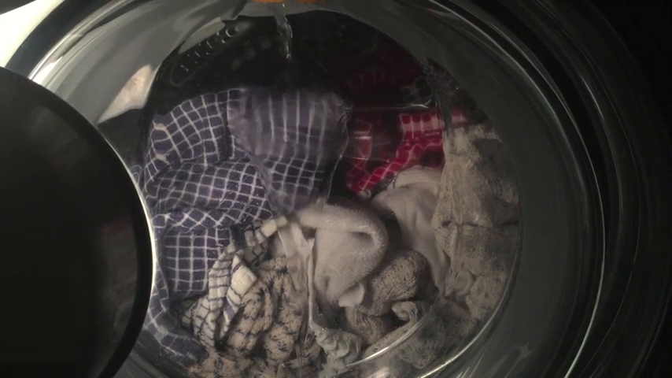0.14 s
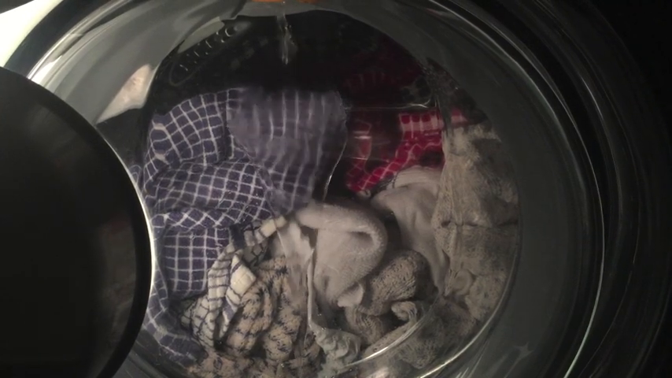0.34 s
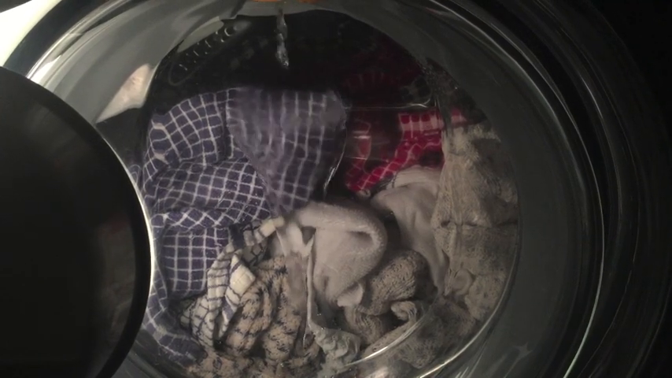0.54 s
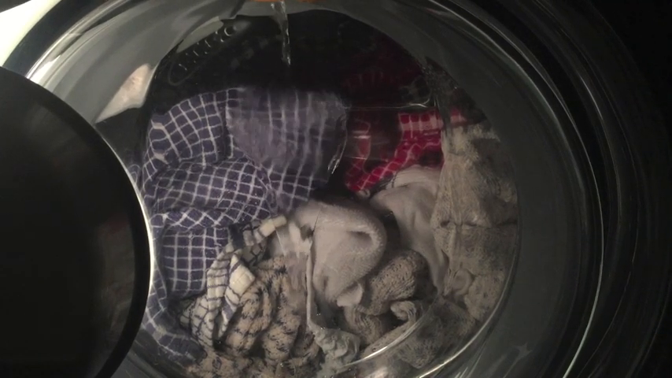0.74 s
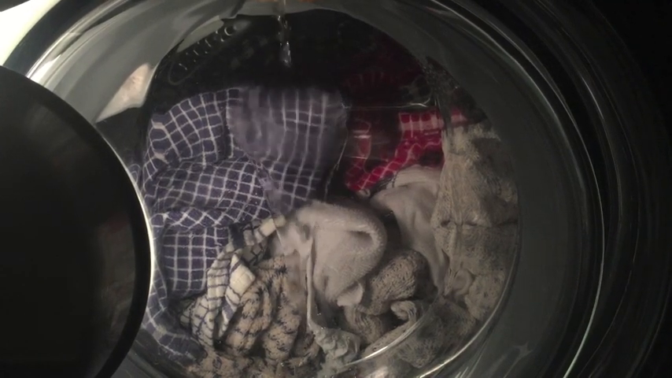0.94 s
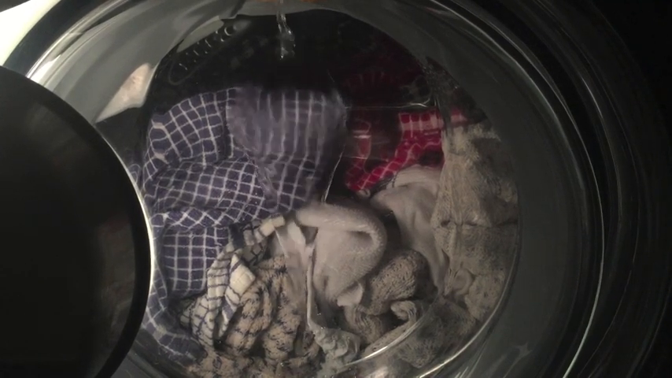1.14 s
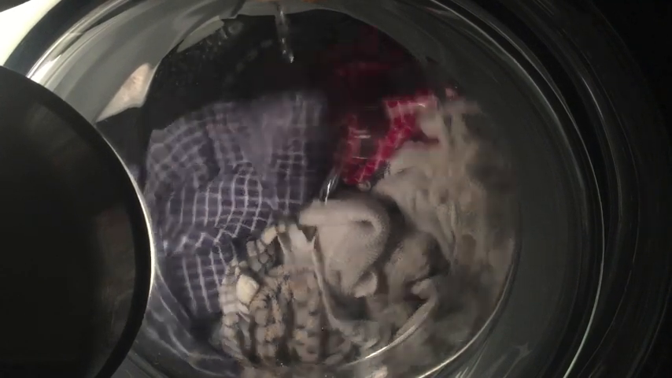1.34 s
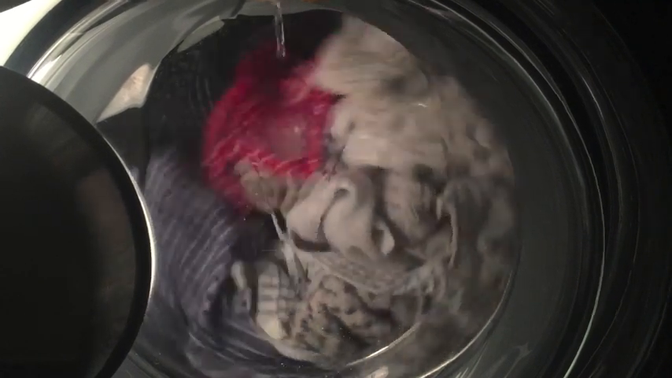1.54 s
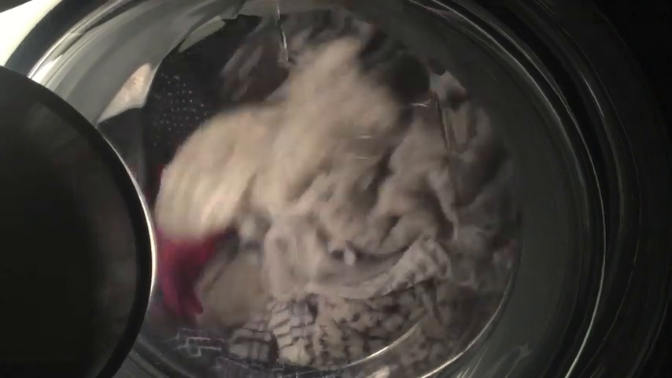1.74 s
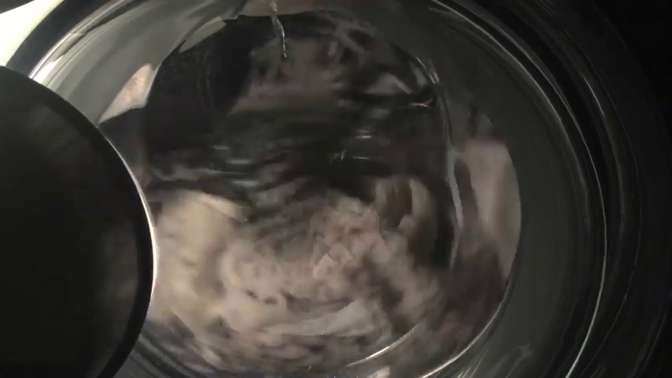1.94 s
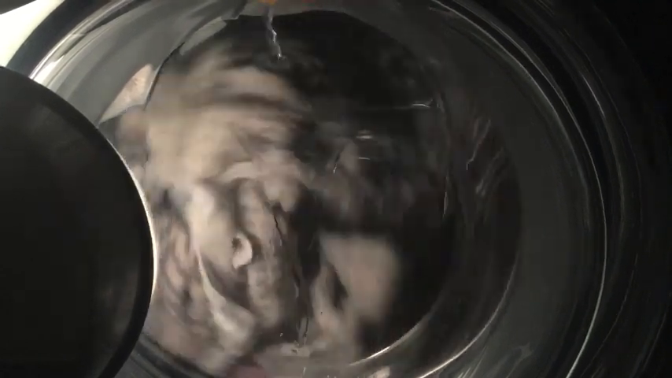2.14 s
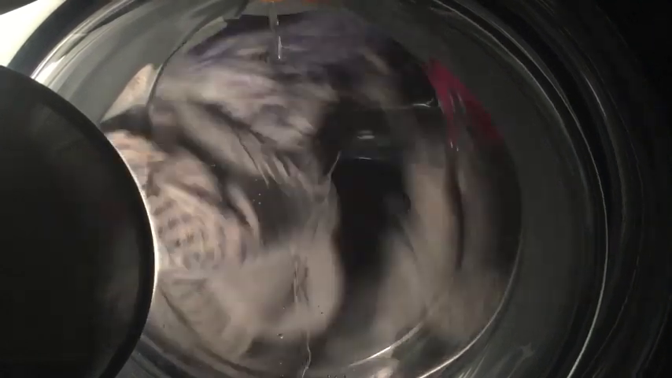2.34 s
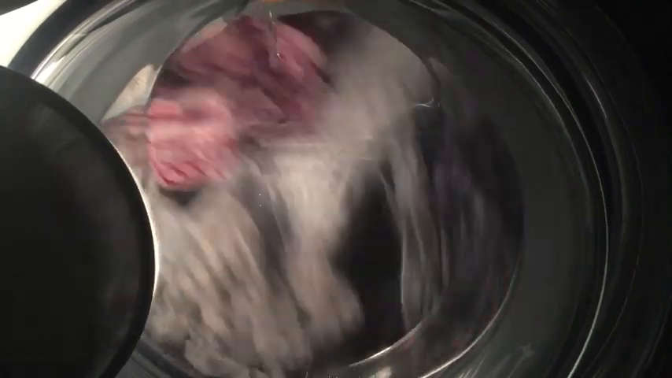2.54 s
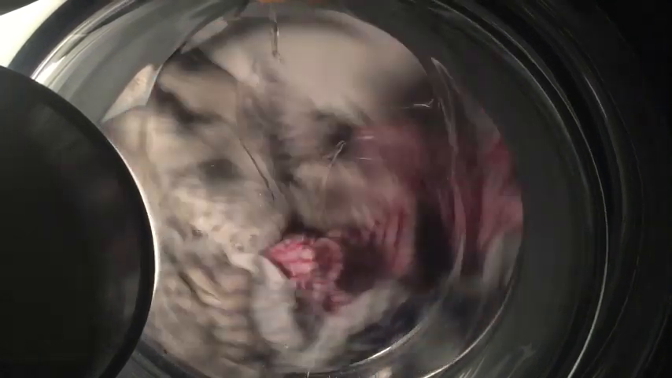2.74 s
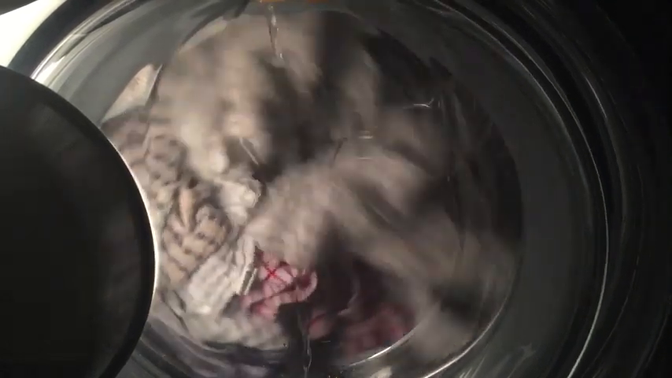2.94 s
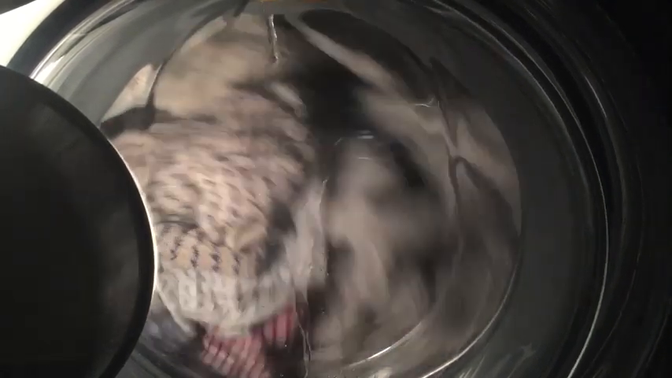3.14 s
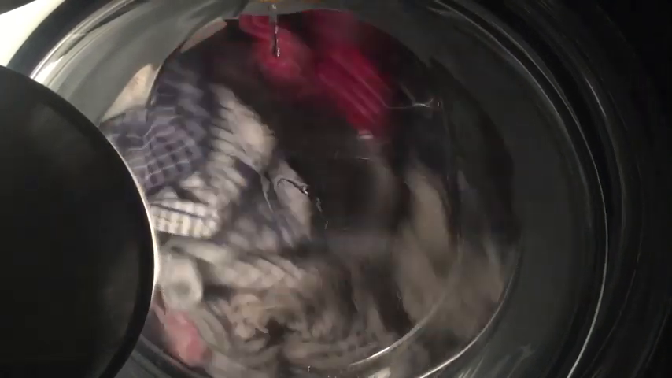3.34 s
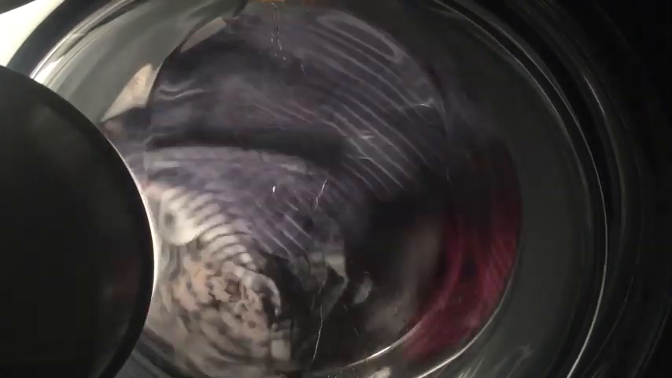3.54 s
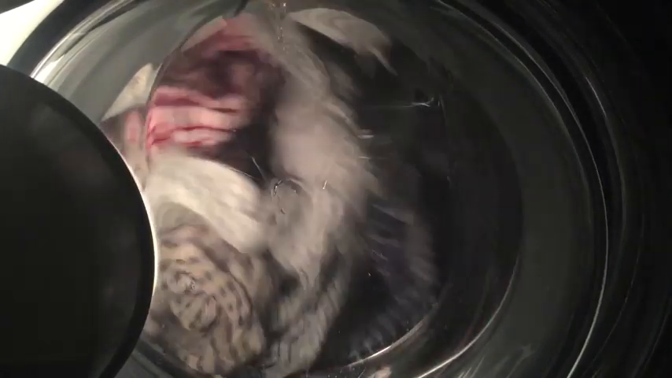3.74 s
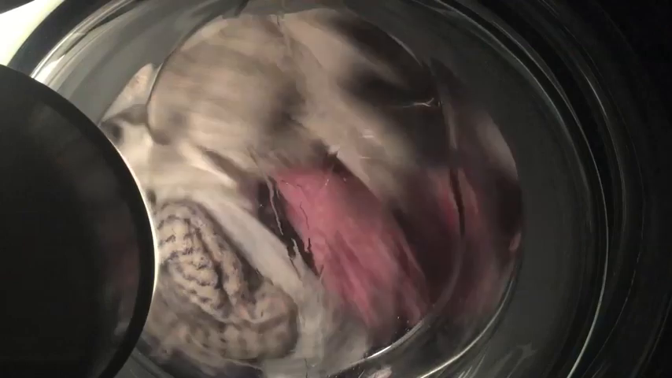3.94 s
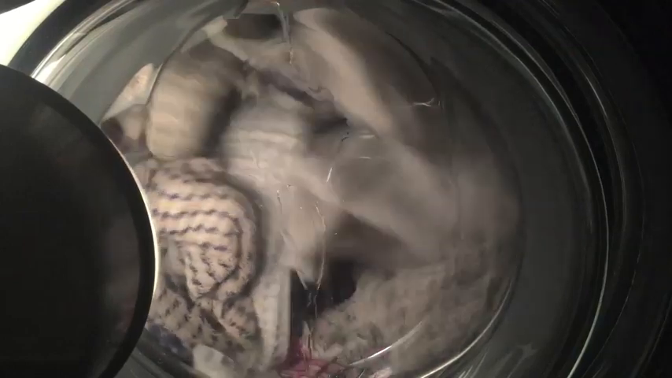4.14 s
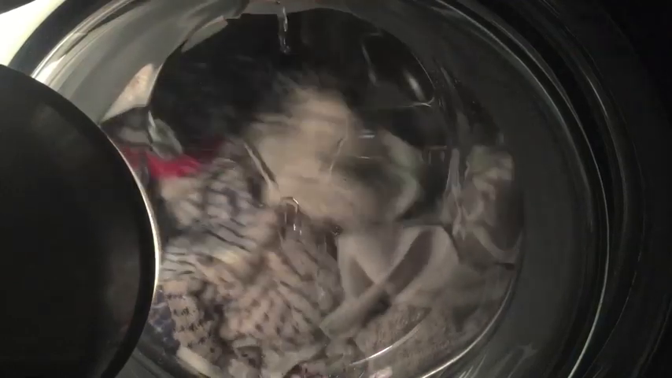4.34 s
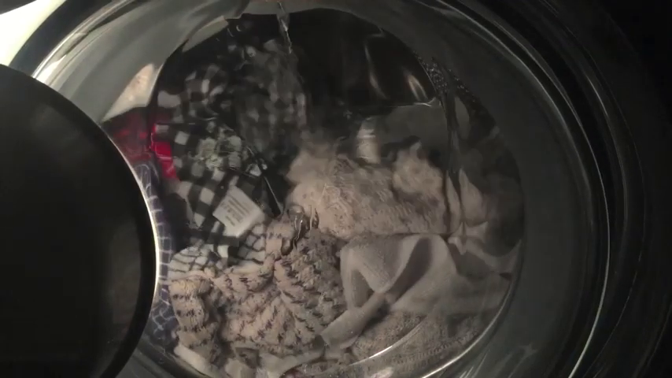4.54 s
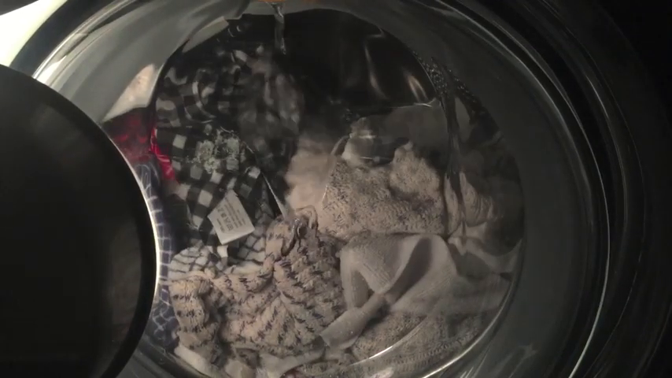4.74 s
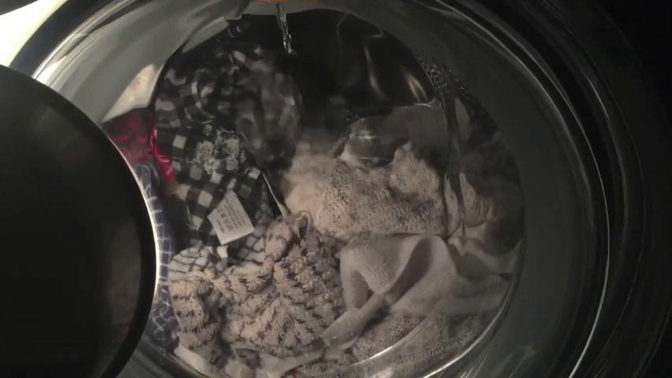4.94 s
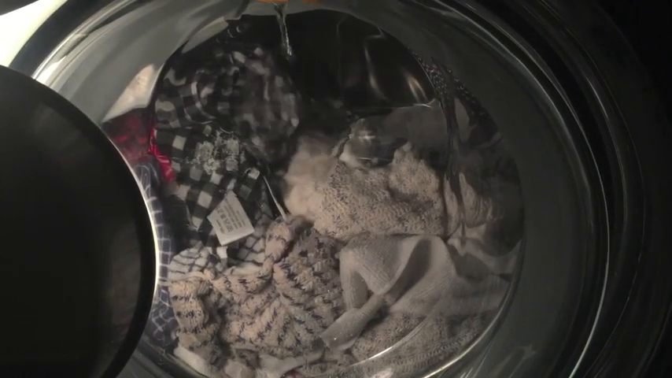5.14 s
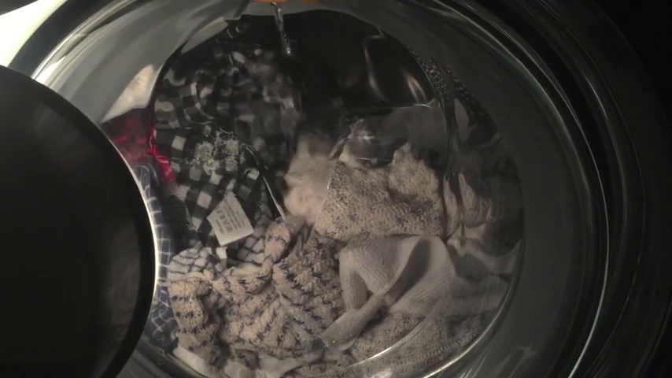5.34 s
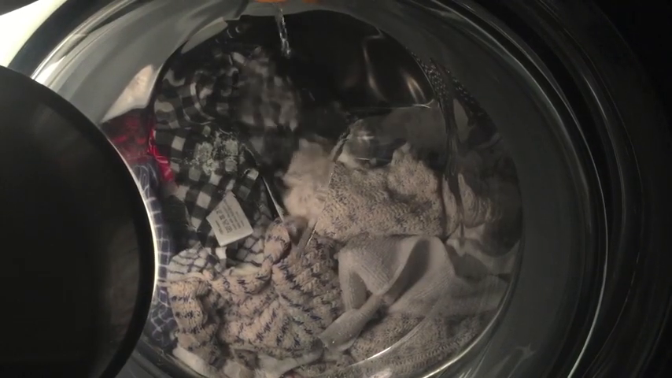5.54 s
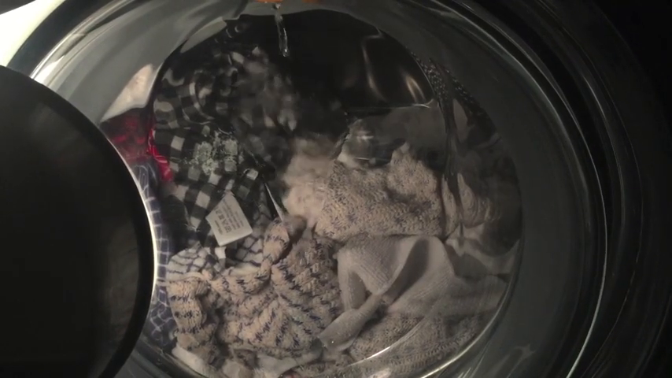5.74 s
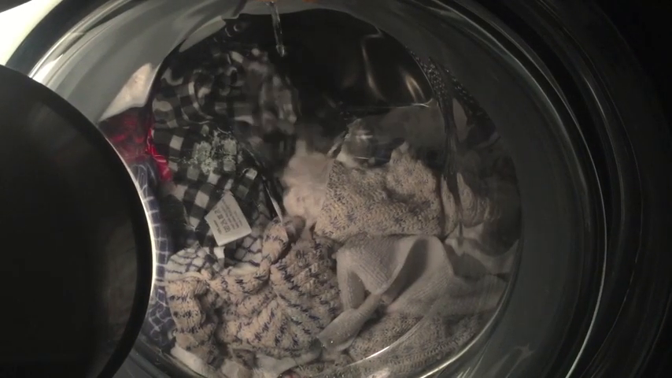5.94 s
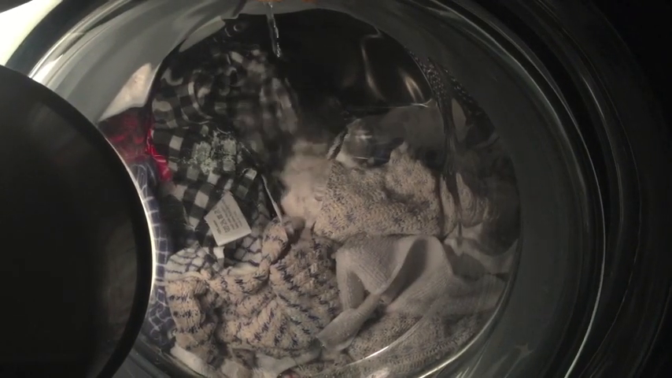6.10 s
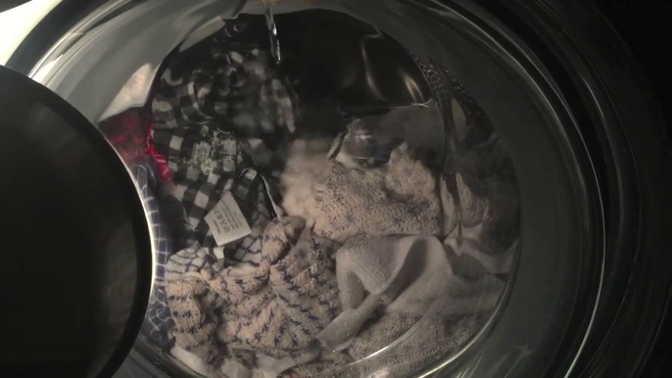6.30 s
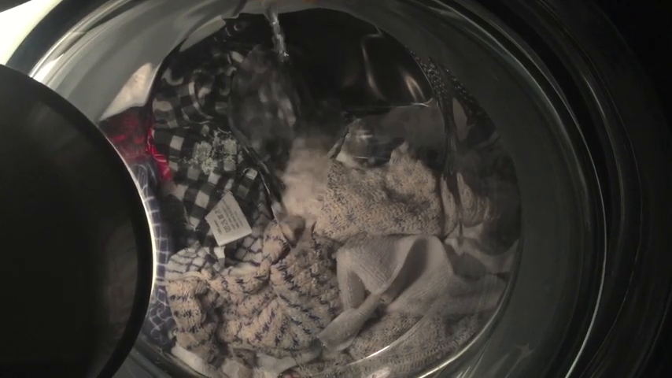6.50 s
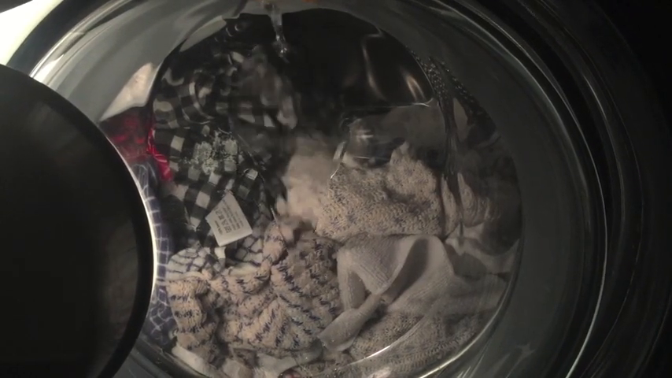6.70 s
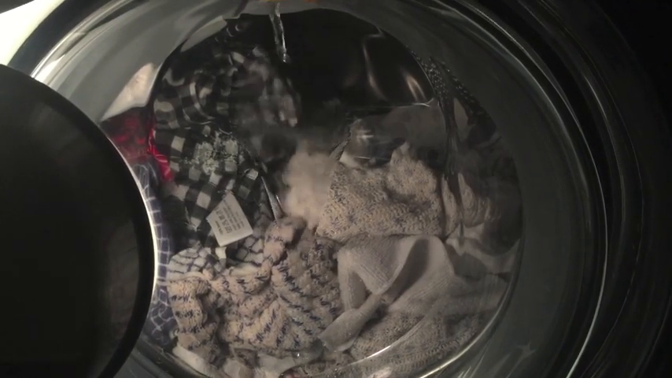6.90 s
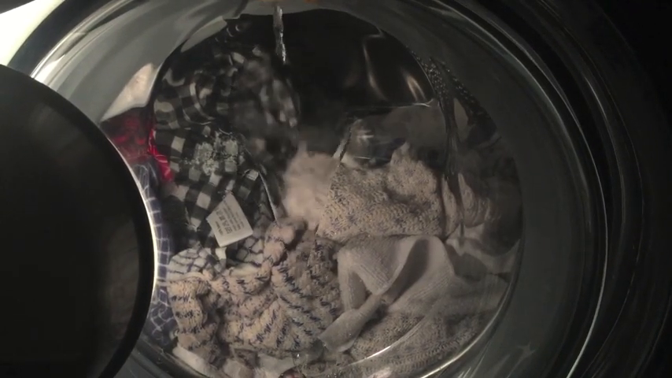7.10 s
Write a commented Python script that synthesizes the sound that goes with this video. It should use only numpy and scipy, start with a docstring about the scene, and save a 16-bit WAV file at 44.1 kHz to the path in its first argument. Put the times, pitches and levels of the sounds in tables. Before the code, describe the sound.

Close to a front-loading washer: quiet hum, a sudden turn with rushing water, hollow churning and motor groan, then a soft bump and drips.

```python
"""Laundry room, one microphone close to the door of a front-loading washing machine. It rests with a mains hum,
then the drum turns for five seconds: water rushes out of the lifted laundry and rings the steel, churns
and gurgles in the hollow tub, and wet cloth thuds down while the motor groans and whines. The tub rocks as
the drum starts and stops; afterwards the water settles with a dribble and a few plops. Drops are random
impacts, bubbles and low knocks swelling rings, cloth and air coloured noise, the motor moving tones."""
import sys
import numpy as np
from scipy import signal
from scipy.fft import rfft, irfft
from scipy.io import wavfile

SR = 44100
rng = np.random.default_rng(int(sys.argv[2]) if len(sys.argv) > 2 else 0)


def bounce(signal):
    """Save signal as a 16-bit WAV file at the path given by the first command-line argument."""
    frames = np.transpose(np.atleast_2d(signal))
    limited = np.clip(frames, -1, 1)
    pcm = np.round(limited * 32767).astype(np.int16)
    wavfile.write(sys.argv[1], SR, pcm)


N = 315756
T = np.arange(N) / SR
FREQS = np.fft.rfftfreq(N, 1 / SR)

# the drum turns from START_S until it brakes at STOP_S; the water follows a little later
START_S, STOP_S, WATER_LAG_S = 1.285, 6.3, 0.039
# air pockets gulping under the load: start_s, peak_db (before reflections), swell_s
GULPS = [(1.378, -37, 0.0044), (1.429, -31.5, 0.0046), (1.967, -29.5, 0.0032), (2.009, -28, 0.0061),
         (2.023, -24, 0.011), (2.848, -23.5, 0.0093), (3.077, -30, 0.0047), (3.117, -30.5, 0.0094),
         (3.157, -35.5, .0045), (3.238, -32, 0.0058), (3.423, -31.5, 0.0056), (3.529, -27.5, 0.0053),
         (3.563, -28.5, 0.0059), (3.853, -26.5, 0.0094), (4.433, -32, 0.0022), (5.319, -33.5, 0.0068),
         (5.586, -30.5, 0.006), (5.994, -29.5, 0.0075)]
# the lifted load empties in gushes: start_s, length_s, level_db
GUSHES = [(1.38, 0.42, -41.5), (1.864, 0.082, -43.5), (1.966, 0.34, -51.5)]
# colour of droplets on the door: frequency_hz, relative_level_db
SPRAY = [(1500, -11), (2550, 0), (3000, -8), (4150, -4.5), (4800, -12), (5700, -6), (6800, -10.5),
         (10400, -17), (12300, -16), (15000, -21)]


def undb(db):
    """Decibels to gain."""
    return 10 ** (np.asarray(db) / 20)


def unit(x):
    """Scale to rms 1."""
    return x / np.sqrt(np.mean(x ** 2))


def colour(x, points):
    """Causal minimum-phase filter through (Hz, dB) points; rms 1."""
    hz, db = np.transpose(points)
    gain_db = np.interp(np.log(FREQS + 1), np.log(hz), db)
    cepstrum = irfft(np.log(undb(gain_db)), N)
    # folding the cepstrum onto positive time makes the filter causal
    cepstrum[1:N // 2] *= 2
    cepstrum[N // 2 + 1:] = 0
    return unit(irfft(rfft(x) * np.exp(rfft(cepstrum)), N))


def walk(rate):
    """Smooth random drift of rms 1 that changes about rate times a second."""
    return unit(irfft(rfft(rng.standard_normal(N)) * np.exp(-(FREQS / rate) ** 2), N))


def impacts(rate, spread_db):
    """Random tiny impacts, about rate a second, of uneven strength; rms 1."""
    size = undb(spread_db * np.minimum(rng.exponential(size=N), 4))
    struck = rng.random(N) < rate / SR
    return unit(struck * size * rng.choice([-1, 1], N))


def add(out, start_s, x):
    """Mix a short sound in at its time."""
    i = int(start_s * SR)
    out[i:i + len(x)] += x[:max(N - i, 0)]


def ring(hz, swell_s, glide):
    """A damped ring of about peak 1; at swell_s it is loudest and at hz, gliding by that share per swell_s."""
    age = np.arange(int(4 * swell_s * SR)) / (swell_s * SR)
    envelope = age * np.exp((1 - age ** 2) / 2)
    cycles = hz * swell_s * age * (1 + glide * (age / 2 - 1))
    return envelope * np.sin(2 * np.pi * cycles)


def bubbling(low_hz, high_hz, cycles, spread_db, count):
    """A crowd of bubbles of random size, each swelling over the given cycles; rms 1."""
    out = np.zeros(N)
    for when, size, strength in rng.random((count, 3)):
        hz = low_hz * (high_hz / low_hz) ** size
        loud = undb(-spread_db * np.log(max(strength, 1 / 40)))
        add(out, when * N / SR, loud * ring(hz, cycles / hz, glide=0.02))
    return unit(out)


def enclosure(x, t60_s, wet_db):
    """Dense short reflections between drum and door glass, as a decaying noise tail."""
    t = T[:SR // 4]
    tail = rng.standard_normal(len(t)) * undb(-60 * t / t60_s)
    return x + undb(wet_db) * signal.fftconvolve(x, tail / np.linalg.norm(tail))[:N]


def bursts(table):
    """Envelope of sudden contacts, each fading at its own pace."""
    out = np.zeros(N)
    for s, db, decay_s in table:
        age = T[:SR // 2]
        add(out, s, undb(db) * (1 - np.exp(-age / 0.0012)) * np.exp(-age / decay_s))
    return out


def swell(start_s, length_s, rise_s, fall_db_s, sag_db_s=0):
    """Envelope that rises, holds (sagging a little) and dies away."""
    age = np.maximum(T - start_s, 0)
    rise = np.sin(np.pi / 2 * np.minimum(age / rise_s, 1)) ** 2
    return rise * undb(-sag_db_s * age - fall_db_s * np.maximum(age - length_s, 0))


def turning(lag_s, rise_s, fall_db_s, sag_db_s=0):
    """Envelope of something that sounds for as long as the drum turns, lag_s behind it."""
    return swell(START_S + lag_s, STOP_S - START_S, rise_s, fall_db_s, sag_db_s)


def sine(hz):
    """A tone of rms 1 that follows a moving pitch."""
    return np.sqrt(2) * np.sin(2 * np.pi * np.cumsum(hz) / SR)


def resonate(x, hz, width_hz):
    """A resonance whose centre follows a moving pitch; rms 1."""
    turn = np.exp(2j * np.pi * np.cumsum(hz) / SR)
    # shift the centre to 0 Hz, low-pass there, and shift back
    lowpass_b, lowpass_a = signal.butter(2, width_hz / 2, fs=SR)
    return unit((signal.lfilter(lowpass_b, lowpass_a, x / turn) * turn).real)


def room():
    """The resting machine and room: a soft rush of coloured noise with a faint trickle in the drum."""
    # frequency_hz, relative_level_db
    air_colour = [(25, -47), (45, 4.5), (115, 13), (170, -1.5), (300, 0.5), (430, -5), (600, 0), (1100, 2),
                  (2600, -9.5), (6000, -15.5), (15000, -22.5)]
    air = colour(rng.standard_normal(N) * undb(.5 * walk(8.3)), air_colour)
    trickle = bubbling(low_hz=750, high_hz=1700, cycles=7, spread_db=3, count=500)
    return air * undb(-68.0) + trickle * undb(-78)


def mains_hum():
    """Steady mains tones throughout, stronger and more wavering while the drum turns."""
    # frequency_hz, rms_db at rest
    partials = [(100, -64), (500, -83.5)]
    hum = sum(np.sqrt(2) * undb(db) * np.sin(2 * np.pi * (hz * T + rng.random())) for hz, db in partials)
    running = turning(0, rise_s=0.086, fall_db_s=80, sag_db_s=0.8)
    wobble = walk(7)
    boost_db = running * (11.5 + 3.3 * wobble)
    return hum * undb(boost_db + 0.54 * wobble)


def squelch(hz, count):
    """A handful of bubbles of nearly one size burst in quick succession; peak 1."""
    length_s, pitch_spread, swell_s = .013, 0.082, 0.0034  # the spread is a share of the pitch
    out = np.zeros(SR // 10)
    for k, size in enumerate(rng.permutation(np.linspace(-1, 1, count))):
        delay_s = length_s * (k + rng.random()) / count
        bubble = ring(hz * (1 + pitch_spread * size), swell_s, glide=0)
        add(out, delay_s, bubble / (1 + 2 * size ** 2))
    return out / np.max(np.abs(out))


def bubbles_and_knocks():
    """Bubbles, alone or in clusters, and low knocks of the load on the drum wall, echoing in the drum."""
    # small clusters of bubbles bursting: start_s, peak_db (before reflections), pitch_hz
    squelches = [(.449, -57, 1115), (.842, -62, 2230), (.905, -69, 3170), (1.124, -54, 2490),
                 (3.03, -47, 1880), (4.43, -50, 1730), (4.54, -53, 2030), (4.614, -49, 1650),
                 (5.333, -45, 2140), (5.5, -45.5, 1720), (5.855, -51, 2120), (6.092, -53, 3930),
                 (6.357, -58, 4800), (6.63, -49.5, 1950), (6.843, -52, 1640)]
    # single bubbles and low drum knocks: start_s, peak_db (before reflections), pitch_hz, swell_s
    plops_and_knocks = [(1.463, -39, 523, 0.0057), (1.778, -33, 1444, 0.007), (2.337, -40, 202, 0.015),
                        (2.344, -31, 315, 0.01), (3.595, -33.5, 1265, 0.0033), (3.997, -39.5, 306, 0.011),
                        (5.499, -37.5, 1230, 0.0045), (6.387, -42.5, 1216, .004), (6.505, -35, 1270, 0.005),
                        (6.714, -45.5, 1270, 0.0057), (6.822, -41.5, 1294, 0.0043),
                        (6.869, -44, 1265, 0.0042), (6.923, -49.5, 1254, 0.0079)]
    out = np.zeros(N)
    for s, db, hz in squelches:
        add(out, s, undb(db) * squelch(hz, count=5))
    for s, db, hz, swell_s in plops_and_knocks:
        add(out, s, undb(db) * ring(hz, swell_s, glide=0.006))
    return enclosure(out, t60_s=.18, wet_db=-9)


def motor():
    """The motor sings briefly as it pulls away, groans low under load and whines thinly: unsteady sine tones."""
    # hauling a heavy wad up the drum wall: start_s, length_s, level_db
    hauls = [(1.285, 0.75, -63.5), (2.037, 0.47, -56), (3.03, 1, -59.5)]
    # pulling away: start_s, length_s, pitch_hz, level_db
    start_notes = [(1.29, 0.05, 4800, -80), (1.354, 0.097, 5470, -74.5)]
    groan_hz, climb_hz_s = 302.3, 11  # pitch as the drum starts, and its climb from there
    effort = sum(undb(db) * swell(s, length_s, rise_s=0.04, fall_db_s=98) for s, length_s, db in hauls)
    pitch_hz = groan_hz + climb_hz_s * (T - START_S)
    groan = sine(pitch_hz * (1 + 0.00802 * walk(8.1))) * effort
    # the thin whine fades as the load eases
    whine = sine(15030 + 28 * walk(60)) * undb(-77 + 2 * walk(17))
    whine = whine * swell(START_S, length_s=2.7, rise_s=.1, fall_db_s=100, sag_db_s=5)
    flutter = 1 + .009 * walk(150)
    notes = sum(sine(hz * flutter) * undb(db) * swell(s, length_s, rise_s=.005, fall_db_s=598)
                for s, length_s, hz, db in start_notes)
    return groan + whine + notes


def laundry():
    """Wet cloth rolls on the drum wall as dense small impacts and lands in thuds of decaying noise."""
    # frequency_hz, relative_level_db
    cloth_colour = [(50, -43), (88, 3.5), (125, -2), (168, 6), (215, -2.5), (312, -1), (395, -9),
                    (490, -1.5), (570, -2), (800, -48)]
    # heavy wet cloth landing: start_s, level_db, decay_s
    thud_table = [(1.355, -46.5, 0.019), (1.865, -45, 0.04), (2.12, -54, 0.18), (2.335, -55, 0.064),
                  (5.965, -42, 0.031), (6.585, -49, 0.015)]
    # the load loosens and rolls more softly, hence the sag
    rolling = undb(-50.5) * turning(0, rise_s=0.14, fall_db_s=40.5, sag_db_s=0.56)
    rumble = colour(impacts(rate=600, spread_db=2.5), cloth_colour) * rolling
    thuds = colour(rng.standard_normal(N), cloth_colour) * bursts(thud_table)
    return rumble + thuds


def rocking_tub():
    """The tub sways on its springs as low noise, swings harder at start and stop, and is jolted into low rings."""
    # frequency_hz, relative_level_db
    spring_colour = [(25, -33), (45, -6.5), (62, 7.5), (85, 15), (110, 1), (180, -49.5)]
    # drum starts and brakes: start_s, level_db
    swing_table = [(1.285, -50), (6.44, -48)]
    # jolts as the drum starts and brakes: start_s, peak_db, pitch_hz, swell_s
    jolts = [(1.292, -45.5, 166, 0.0096), (1.314, -46, 90.6, 0.032), (6.383, -39, 96, 0.017),
             (6.429, -35.5, 77.5, 0.011), (6.488, -43, 69.6, 0.011)]
    rise_s, hold_s, fall_db_s = 0.033, 0.074, 58
    swings = sum(undb(db) * swell(s, hold_s, rise_s, fall_db_s) for s, db in swing_table)
    sway = undb(-62.5) * turning(0, rise_s, fall_db_s)
    tub = colour(rng.standard_normal(N), spring_colour) * np.hypot(swings, sway)
    for s, db, hz, swell_s in jolts:
        add(tub, s, undb(db) * ring(hz, swell_s, glide=-0.21))
    return tub


def glugs():
    """Air trapped under the load keeps ringing as the water squeezes it in quick, uneven glugs; rms 1."""
    squeeze = np.tanh(walk(52))
    return unit(sine(694.7 + 33 * walk(70.0)) * undb(6.5 * squeeze))


def churn(waves):
    """Water slaps and glugs in the hollow tub, following the power of the waves and a steady stirring."""
    # frequency_hz, relative_level_db
    tub_colour = [(450, -32), (590, -25), (650, -1.5), (700, 0), (735, -10.5), (775, -1.5), (830, -12.5),
                  (950, -21.5), (1300, -58)]
    stirring = undb(-56.5) * turning(WATER_LAG_S, rise_s=0.028, fall_db_s=98)
    slaps = colour(impacts(rate=1500, spread_db=1.5), tub_colour)
    wash = undb(-3.5) * slaps + undb(-3) * glugs()
    # the churning gives way while a big gulp empties the air pocket
    gulping = np.max([np.exp(-((T - s - swell_s / 2) / (2 * swell_s)) ** 2) for s, _, swell_s in GULPS], axis=0)
    return wash * np.sqrt(waves + stirring ** 2) * (1 - .75 * gulping)


def gurgle_texture(surge):
    """Froth of tiny impacts and bubbles, made metallic by close reflections between drum and glass."""
    # frequency_hz, relative_level_db
    gurgle_colour = [(600, -20.5), (940, -3.5), (1160, 1), (1270, 3), (1400, 4.5), (1530, -4.5),
                     (1810, -17), (1910, -5), (2040, -15.5), (2190, -10), (2400, -28), (2570, -9.5),
                     (3300, -46)]
    bubbles = bubbling(low_hz=900, high_hz=2800, cycles=3.5, spread_db=2, count=7000)
    froth = enclosure(impacts(rate=9000, spread_db=1) + bubbles, t60_s=.06, wet_db=-6)
    return colour(froth * undb(1.07 * surge), gurgle_colour)


def spray_texture(surge):
    """Droplets tick on the door and tiny bubbles fizz in clumps."""
    drops = enclosure(impacts(rate=7000, spread_db=2.6), t60_s=.07, wet_db=-2)
    fizz = bubbling(low_hz=3500, high_hz=6400, cycles=9, spread_db=2, count=3000)
    fizz = unit(fizz * undb(6 * np.tanh(walk(24))))
    return colour(drops * undb(0.97 * surge + 1.2 * walk(39)), SPRAY) + fizz * undb(-10)


def water():
    """Waves run through the tub: they churn, gurgle and spray while it turns, and dribble once it rests."""
    # waves: start_s, length_s, level_db
    sloshes = [(1.368, 0.79, -44.5), (1.814, 0.44, -39), (2.253, 0.4, -41), (2.791, 0.39, -38),
               (3.263, 0.2, -43), (3.474, 0.53, -41), (4.14, 0.087, -42.5), (4.409, 0.3, -41),
               (4.744, 0.36, -40.5), (5.165, 0.42, -41.5), (5.655, 0.34, -40.5), (5.944, 0.34, -38.5)]
    waves = sum((undb(db) * swell(s, length_s, rise_s=0.027, fall_db_s=139, sag_db_s=4)) ** 2
                for s, length_s, db in sloshes)
    # a surge of water lifts froth and spray together
    surge = walk(14.4)
    gurgle = gurgle_texture(surge)
    spray = spray_texture(surge)
    steady_gurgling = undb(-51.5) * turning(WATER_LAG_S, rise_s=0.3, fall_db_s=106)
    # each wave stirs up more froth
    gurgling = np.hypot(steady_gurgling, undb(-14.5) * np.sqrt(waves))
    steady_spraying = undb(-65) * turning(WATER_LAG_S, rise_s=0.17, fall_db_s=187)
    # the first gush throws extra spray, which thins out slowly
    mist = undb(-61.5) * swell(GUSHES[0][0], length_s=0.52, rise_s=0.089, fall_db_s=10.5)
    spraying = np.hypot(steady_spraying, mist)
    return churn(waves) + gurgle * gurgling + spray * spraying + dribble(gurgle, spray)


def pour():
    """A dense stream of drops drums on the steel and rings it and the hollow under the lifted load."""
    # resonances of the steel drum: frequency_hz, width_hz, relative_level_db
    drum_modes = [(540, 19, -5), (688, 53, -13), (834, 58, 4.5), (1032, 35, 1), (1192, 57, 10),
                  (1618, 143, 3.5), (2210, 310, -15), (2894, 224, -10), (4190, 120, -12.5),
                  (5300, 440, -17), (11940, 890, -25.5)]
    response = sum(undb(2 * db) / (1 + (2 * (FREQS - hz) / width) ** 2) ** 1.5 for hz, width, db in drum_modes)
    stream = impacts(rate=4000, spread_db=0) * undb(2.6 * walk(23))
    steel = unit(irfft(rfft(stream) * np.sqrt(response), N))
    # the hollow widens, so its resonance sinks by 158 Hz and settles
    pocket_hz = 1384 + 158 * np.exp(-np.maximum(T - START_S, 0) / 0.49)
    pocket = resonate(stream, pocket_hz, width_hz=150)
    gushes = sum((undb(db) * swell(s, length_s, rise_s=0.26 * length_s, fall_db_s=86, sag_db_s=10)) ** 2
                 for s, length_s, db in GUSHES)
    steady = undb(-59.5) * turning(WATER_LAG_S, rise_s=0.066, fall_db_s=200)
    return (steel + undb(-3) * pocket) * np.sqrt(gushes + steady ** 2)


def gulps():
    """Air pockets gulp under the load; a bigger pocket swells longer and rings lower."""
    out = np.zeros(N)
    for s, db, swell_s in GULPS:
        hz = 737 - 5170 * swell_s  # 5170 Hz lower per second of swell
        add(out, s, undb(db) * ring(hz, swell_s, glide=0.0043))
    return out


def drips():
    """Fat drips knock on the drum: short bursts of coloured noise."""
    # frequency_hz, relative_level_db
    drip_colour = [(300, -4), (750, 4.5), (1350, 4.5), (1900, -16), (12000, -40)]
    # start_s, level_db, decay_s
    drip_table = [(1.467, -32.5, 0.0053), (1.871, -41, 0.0041), (6.607, -49.5, 0.022), (6.724, -51, 0.011),
                  (6.786, -41, 0.0058)]
    return colour(rng.standard_normal(N), drip_colour) * bursts(drip_table)


def splashes():
    """Each splash against drum and door throws a shower of droplets that thins out quickly."""
    # start_s, level_db, decay_s
    splash_table = [(1.53, -51.5, 0.031), (2.545, -61, 0.12), (2.72, -62, 0.031), (3.44, -61, 0.045),
                    (3.845, -58, 0.024), (4.195, -59.5, 0.028), (4.66, -63, 0.054), (5.012, -58, .015),
                    (6.724, -53, 0.0075)]
    beads = bubbling(low_hz=3400, high_hz=7000, cycles=7, spread_db=2, count=3000)
    shower = unit(colour(impacts(rate=1500, spread_db=-1.0), SPRAY) + beads)
    return shower * bursts(splash_table)


def dribble(gurgle, spray):
    """Once the drum rests, the load dribbles into the pool: small bubbles over remnants of gurgle and spray."""
    pool = bubbling(low_hz=1210, high_hz=1340, cycles=9, spread_db=1, count=2000)
    droplets = bubbling(low_hz=1400, high_hz=3000, cycles=9, spread_db=2, count=1200)
    mixture = (pool + gurgle) / 2 + droplets * undb(-16) + spray * undb(-18)
    return mixture * undb(-61) * swell(STOP_S, length_s=0.42, rise_s=WATER_LAG_S, fall_db_s=25)


def scene():
    """Everything reaches one microphone in front of the door."""
    background = room() + mains_hum()
    machine = motor() + laundry() + rocking_tub()
    single_drops = enclosure(gulps() + drips() + splashes(), t60_s=.09, wet_db=-15)
    return (background + bubbles_and_knocks() + machine + water() + pour() + single_drops)[None]


def record(dry):
    """The recorder cuts the top with a steep low-pass at 15250 Hz."""
    return signal.sosfilt(signal.ellip(12, .1, 70, 15250, fs=SR, output="sos"), dry)


dry = scene()
out = record(dry)
bounce(out)
```